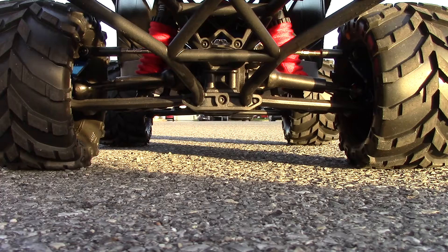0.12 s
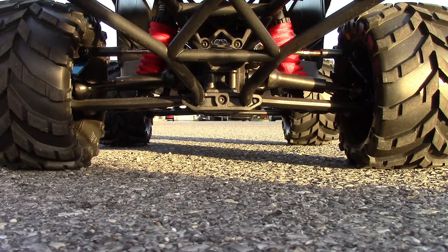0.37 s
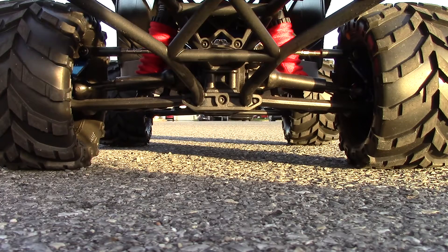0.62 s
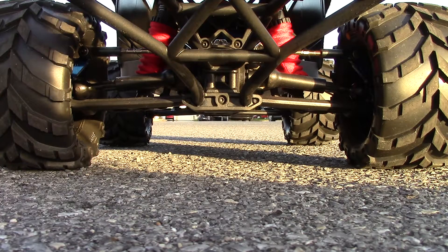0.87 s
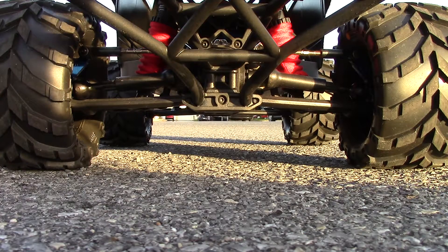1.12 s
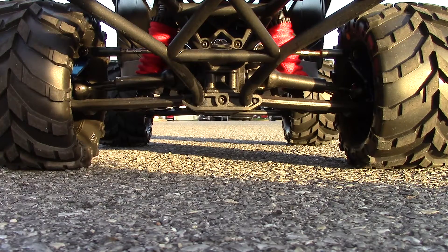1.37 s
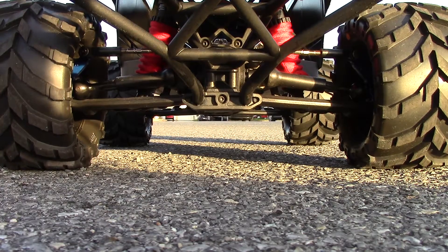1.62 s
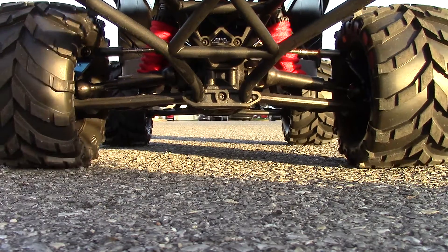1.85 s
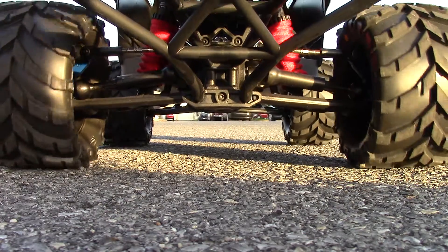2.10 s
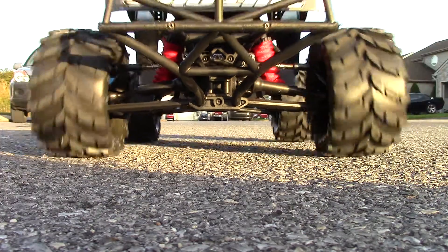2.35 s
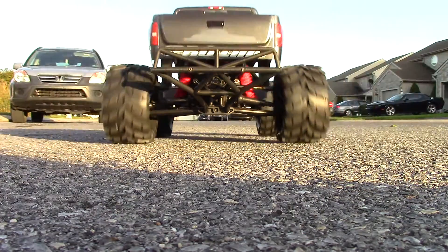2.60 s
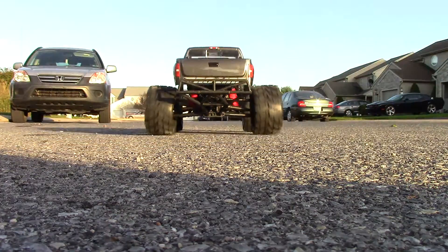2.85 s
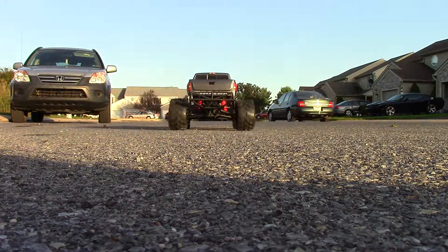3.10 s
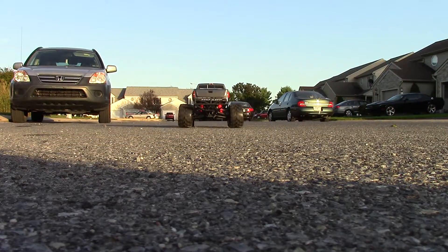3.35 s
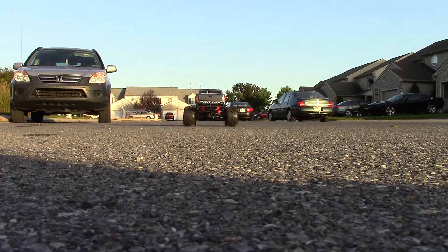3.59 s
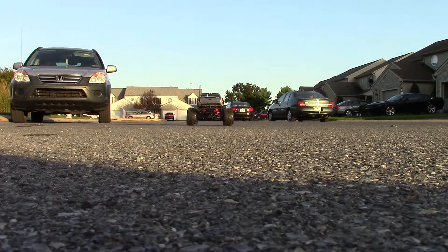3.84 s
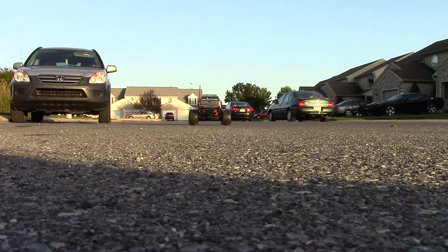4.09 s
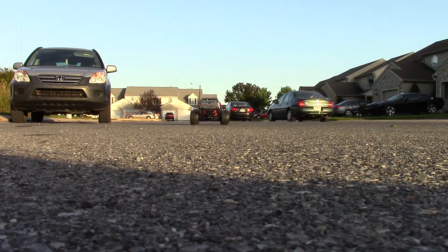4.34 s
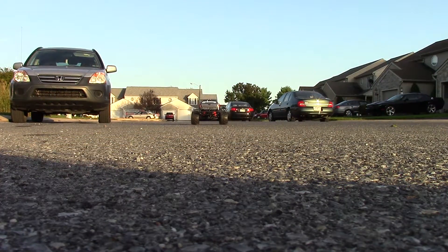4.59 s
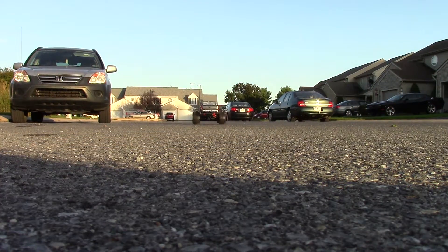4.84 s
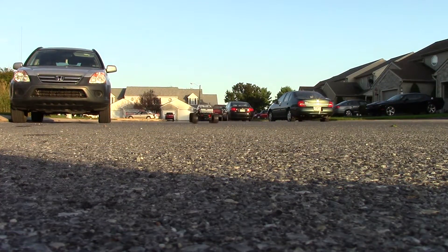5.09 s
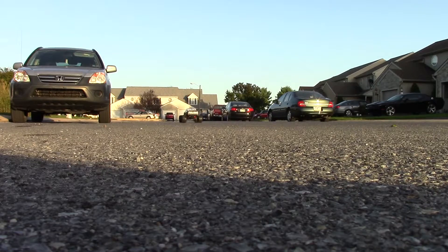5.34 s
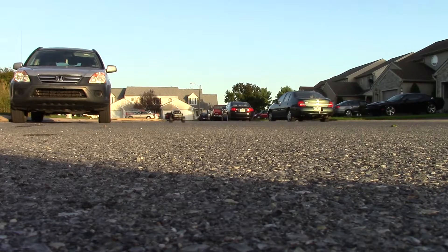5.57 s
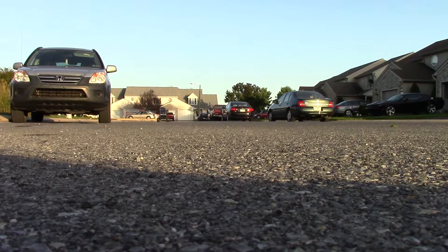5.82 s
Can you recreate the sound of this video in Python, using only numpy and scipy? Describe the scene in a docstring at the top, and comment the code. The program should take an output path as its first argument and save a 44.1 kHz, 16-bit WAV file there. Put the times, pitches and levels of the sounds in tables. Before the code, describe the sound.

Close, nearly central sound of a model truck on a quiet street: soft fan rush and a dull knock first, then a harsh buzzing whine near 1.8 kilohertz stuttering over gritty tyre slips. The truck pulls off, skids briefly, and rattles away on slowing, fading ticks. After a near lull come faint braking tones, then far-off gear whine and tyre roar.

```python
"""On asphalt, with street murmur behind: an electric model truck stands close by, its fan running.
The speed controller whines in harmonics of its switching tone; the wheels lurch and scrub in bursts of
shaped noise. The truck rolls off, brakes and coasts, its gear lash knocking once a shaft turn. Far away
it brakes again and accelerates with a noisy gear-mesh whine and tyre roar."""
import sys
import numpy as np
from scipy import signal
from scipy.fft import rfft, irfft, next_fast_len
from scipy.io import wavfile
from scipy.ndimage import uniform_filter1d, minimum_filter1d

SR = 44100
rng = np.random.default_rng(int(sys.argv[2]) if len(sys.argv) > 2 else 0)


def field_ratio(decibels):
    """Amplitude ratio for a level in dB (20 dB per decade); scalars and array-likes work."""
    return 10 ** (np.asarray(decibels, dtype=float) / 20)


def unload_audio(sound):
    """Save the sound as a 16-bit wav file, at the path given as the first command line argument."""
    columns = np.transpose(np.atleast_2d(sound))
    # keep every value between -1 and 1, then stretch to whole-number steps
    steps = np.round(np.clip(columns, -1, 1) * 32767)
    wavfile.write(sys.argv[1], SR, steps.astype(np.int16))


N = 262395
TIME = np.arange(N) / SR   # [s]

# switching tone: (time [s], pitch [Hz], rotor rattle [0-1], overtone blur [0-1])
CHOPPER = [(1.03, 1767, .05, .1), (1.43, 1768, .1, .2), (1.47, 1770, .42, .72), (2.12, 1770, .42, .78),
           (2.2, 1765, .45, .93), (2.23, 1748, .3, .94), (2.27, 1764, .26, .94), (2.35, 1762, .18, .92),
           (2.8, 1754, .14, .85)]
# its harmonics: (multiple, relative level [dB])
CHOPPER_ORDERS = [(1, 0), (2, -16.5), (3, -25), (4, -31), (5, -34.5), (6, -41.5), (7, -45), (8, -47)]
# its brightness: (time [s], lift of orders 2 and up [dB], tilt above order 3 [dB per order])
CHOPPER_TILT = [(1.03, 6, 3), (1.38, 6, 2.5), (1.42, 2, 1), (2.1, 3, 0.5), (2.3, 3, -1.5), (2.5, -1, -2),
                (2.8, -2, -2)]
# share of the blur, one value per harmonic: [0-1]
BLUR_SHARE = [0, 1, 1, 1, .95, .95, 1, 1]
# throttle, as the whine it gives: (time [s], level [dB])
THROTTLE = [(1.39, -24), (1.437, -23), (1.452, -12.5), (1.55, -9.5), (1.6, -11.5), (1.66, -13.5),
            (1.735, -6), (1.795, -7.5), (1.81, -18), (1.895, -13), (1.925, -8.5), (2.02, -9.5), (2.13, -10),
            (2.15, -23.5), (2.17, -17.5), (2.22, -6.5), (2.48, -10), (2.8, -14)]
# faint whine before the wheels move; throttle let go
CREEP_START_S, CREEP_DB, RELEASE_S = 1.037, -43, 2.803
# a new throttle value every radio frame, each a little off the stick position
FIRST_FRAME_S, FRAME_S, FRAME_SPREAD_DB = 1.386, .019876, 1.5
# the drive shaft speeds up evenly; the whine throbs once a turn
LAUNCH_S, LAUNCH_TURNS_PER_S, SPEEDUP_TURNS_PER_S2 = 2.225, 5.8, 48.4
THROB_DB, THROB_GROWTH_DB_PER_S = 3.5, 4.5
# gear mesh while gathering speed: (time [s], pitch [Hz], level [dB])
LAUNCH_MESH = [(2.25, 503, -35), (2.42, 690, -40.5), (2.58, 962, -44), (2.66, 1083, -52), (2.75, 1230, -32),
               (2.92, 2050, -45)]

# tyres slipping on grit: (time [s], thud [dB], scrub [dB], length [s])
LURCHES = [(1.466, -28.5, -22.5, 0.038), (1.534, -26, -24, 0.035), (1.566, -39, -22, 0.039),
           (1.605, -14.5, -9.5, 0.031), (1.65, -15, -10, 0.036), (1.703, -13, -6, 0.023),
           (1.885, -14, -10.5, 0.026), (1.95, -18, -16, 0.026), (2.006, -20, -12, 0.051),
           (2.035, -23, -12.5, 0.035), (2.08, -19.5, -11, 0.029), (2.18, -23.5, -15.5, 0.021),
           (2.199, -19.5, -13, 0.015)]
# thud spectrum: (frequency [Hz], relative density [dB])
THUD = [(88, -61), (150, -38), (248, -19), (667, -1), (825, -15), (1280, -5.5), (1580, -14.5), (1790, -5),
        (2030, -19), (3000, -15.5), (3900, -30), (6600, -120)]
# scrub and skid spectrum: (frequency [Hz], relative density [dB])
SCRUB = [(300, -70), (900, -48), (1250, 1.5), (2000, -1.5), (2700, 3), (3500, -0.5), (4300, -6), (5300, -7),
         (6500, -14), (8500, -12), (10000, -19), (11800, -11), (14500, -30), (15700, -36)]
# dull knock on the plastic shell: (time [s], level [dB], swell [s], fade [s])
SHELL_KNOCK = (0.034, -24, .017, .01)
# its spectrum: (frequency [Hz], relative density [dB])
SHELL = [(150, -40), (350, -8), (700, 0), (1000, -1), (1400, -8), (1900, -8), (3000, -18), (6000, -50)]

# rolling: (time [s], tread rumble [dB], grit and gear clatter [dB], grit hiss [dB])
ROLLING = [(1.36, -61, -46, -56), (1.46, -55, -25.5, -39), (1.59, -42, -21.5, -32),
           (1.7, -37.5, -31.5, -32.5), (1.98, -39, -20.5, -24), (2.09, -57, -55, -80),
           (2.198, -42, -24.5, -28.5), (2.754, -44, -26.5, -36), (2.9, -37.5, -22, -36.5),
           (2.94, -41, -36, -39), (3.174, -49.5, -48.5, -50.5), (3.716, -52.5, -48.5, -54.5),
           (4.3, -56, -59, -80), (4.486, -55.5, -46.5, -51.5), (4.8, -57, -36.5, -56)]
# tread rumble spectrum: (frequency [Hz], relative density [dB])
RUMBLE = [(60, -53), (150, -34), (300, -6.5), (450, 0), (650, 0.5), (850, -9), (1100, -10), (1400, -13),
          (3000, -78)]
# grit hiss spectrum: (frequency [Hz], relative density [dB])
HISS = [(1500, -55), (3500, 14.5), (4600, 10), (5400, 8), (6200, 4), (7100, 8), (8200, 2), (9800, -3.5),
        (11500, -1.5), (13500, -25), (15700, -35)]
# gearbox and frame resonances: (frequency [Hz], width [Hz], gain [dB])
CHASSIS = [(1269, 64, -4), (1570, 260, -4.5), (1880, 76, 6), (2143, 39, 8), (2524, 77, 0.5),
           (2834, 71, 3.5), (3070, 82, 2.5), (3635, 110, -1.5)]

# braking tone: (start [s], end [s], pitch [Hz], swell by the end [dB], orders 1, 2, 3, 4 [dB])
BRAKES = [(2.806, 2.914, 1503, -6, -18.5, -21.5, -55, -55), (4.393, 4.608, 1496, 8, -55, -47.5, -63, -70.5),
          (4.613, 4.791, 1490, 8, -66, -36.5, -82, -64), (4.768, 5.4, 1484, 1, -80, -75, -80, -53)]
# locked tyres: (start [s], end [s], level [dB])
SKID = (2.77, 2.922, -21.5)

# coasting: the shaft slows evenly, the lash knocks once a turn, fainter with distance
TEETH = 42
COAST_S, COAST_END_S, COAST_TURNS_PER_S, SLOWING_TURNS_PER_S2 = 2.9413, 4.4, 51.21, 21.23
KNOCK_DB, KNOCK_FADE_DB_PER_S, KNOCK_SPREAD_DB, KNOCK_JITTER_TURNS = -21.5, 16.5, 1.9, 0.052
TICK_DB, TICK_FADE_DB_PER_S, TICK_SPREAD_DB = -58, 17, 6
# mesh tone in the knock sinks away
MESH_SHARE_DB, MESH_SHARE_END_DB, MESH_SHARE_FADE_S = 9, -10, .4
# turns with their own time and levels: (time [s], knock [dB], bright tick [dB])
TIMED_KNOCKS = [(2.943, -29, -55), (2.962, -19, -54), (3.061, -21.5, -50), (3.103, -19, -48),
                (3.123, -21.5, -60), (3.187, -25, -45), (3.21, -20.5, -61), (3.2315, -22.5, -61),
                (3.254, -22.5, -59), (3.274, -22.5, -62), (3.323, -24.5, -54), (3.392, -27, -53),
                (3.516, -26.5, -50), (3.653, -28.5, -65), (3.735, -36.5, -53), (3.8883, -31.5, -62),
                (4.062, -36.5, -56), (4.2084, -40, -56), (4.3, -44, -66), (4.36, -49, -56)]
# tick spectrum: (frequency [Hz], relative density [dB])
TICK = [(5000, -47), (7000, -5), (9500, -11), (11200, -3), (13000, -19), (15500, -44)]
# body shell droning while the wheels turn: (time [s], level [dB])
DRONE = [(2.25, -37), (2.54, -33), (2.72, -40.5), (3.6, -46.5), (4.13, -52.5), (4.7, -55)]

# gear mesh far off: (time [s], pitch [Hz], level [dB])
MESH = [(4.75, 950, -45), (4.8, 1200, -41), (4.84, 1800, -35), (4.88, 2250, -33.5), (4.95, 2602, -33),
        (5.031, 2902, -33), (5.11, 2650, -33.5), (5.2, 3053, -34.5), (5.35, 3250, -34.5), (5.46, 3900, -32),
        (5.53, 5200, -37.5), (5.601, 5500, -36), (5.79, 4860, -47)]
# its harmonics: (multiple, gain [dB])
MESH_ORDERS = [(1, 7.5), (2, -5), (3, -6.5)]
# tyres under power far off: (time [s], tread rumble [dB], roar [dB], hiss [dB])
PULL = [(4.78, -47, -28, -39), (4.82, -38.5, -38, -49), (4.906, -31.5, -34.5, -42.5),
        (5.066, -33, -33.5, -43), (5.104, -43, -34, -43.5), (5.242, -39, -34, -41),
        (5.476, -38.5, -31.5, -43.5), (5.54, -30.5, -28, -34.5), (5.734, -38, -30.5, -40),
        (5.854, -46, -37.5, -58), (5.95, -47, -36, -55)]
# roar spectrum: (frequency [Hz], relative density [dB])
ROAR = [(410, -37), (700, -23), (846, 2), (997, -9.5), (1160, -0.5), (1650, -3.5), (2550, 1.5), (4100, -6),
        (5000, -14), (6500, -57), (11000, -120)]
# far hiss spectrum: (frequency [Hz], relative density [dB])
FAR_HISS = [(2650, -78), (4500, -54), (4890, -39.5), (5890, 2), (6630, 5), (7240, 1), (9530, -10),
            (11100, -6.5), (14300, -32), (15500, -39)]

# cooling fan: (time [s], rush level [dB])
FAN = [(0.0, -36), (1.76, -36), (2.6, -47.5), (4.44, -53), (4.85, -46.5), (5.95, -47.5)]
# air rush spectrum: (frequency [Hz], relative density [dB])
FAN_RUSH = [(18, -56), (30, -25), (173, 0), (270, -5), (359, -2.5), (996, -10), (1140, -15), (1260, -12.5),
            (1640, -11.5), (2020, -15.5), (2420, -10), (4090, -11), (5170, -24.5), (6210, -18.5),
            (15500, -55)]
# steady blade tones: (frequency [Hz], level [dB])
FAN_TONES = [(177.6, -51), (360.7, -49.5), (430.7, -51.5), (1168, -44), (2342, -47.5), (3133, -50),
             (3327, -51), (4097, -58.5), (5389, -61), (6137, -57.5), (6686, -69)]
# street murmur spectrum: (frequency [Hz], relative density [dB])
STREET = [(18, -45), (30, -1), (455, -9.5), (728, -15), (1330, 1.5), (1640, -7), (2180, -1), (6050, -67),
          (11000, -20), (15500, -62)]
# stereo scatter: (frequency [Hz], side against mid [dB])
WIDTH = [(60, -21), (110, -28), (200, -24), (380, -30), (700, -36), (1290, -37), (2380, -34), (4400, -30),
         (8120, -29), (15000, -23)]


def rms_one(x):
    """Scale to rms 1."""
    return x / np.sqrt(np.mean(np.abs(x) ** 2) + 1e-20)


def in_time(rows):
    """Columns of a curve table, one value a sample."""
    s, *columns = np.transpose(rows)
    return [np.interp(TIME, s, c) for c in columns]


def shaped(x, spectrum):
    """Filter x by a (Hz, dB) spectrum, interpolated over log frequency."""
    size = next_fast_len(N)
    hz, db = np.transpose(spectrum)
    grid_hz = np.maximum(np.arange(size // 2 + 1) * SR / size, 1)
    gain = field_ratio(np.interp(np.log(grid_hz), np.log(hz), db))
    return irfft(rfft(x, size) * gain, size)[:N]


def coloured(x, spectrum):
    """Shaped and scaled to rms 1."""
    return rms_one(shaped(x, spectrum))


def noise(spectrum):
    """Coloured Gaussian noise, rms 1."""
    return coloured(rng.standard_normal(N), spectrum)


def wobble(width_hz):
    """Complex noise through a double one-pole low-pass; rms 1."""
    r = np.exp(-2 * np.pi * width_hz / SR)
    white = rng.standard_normal(N) + 1j * rng.standard_normal(N)
    return rms_one(signal.lfilter([1], [1, -2 * r, r * r], white))


def grit(per_s, spread_db, bed):
    """Sparse clicks of uneven size over a bed of noise."""
    sizes = field_ratio(spread_db * np.minimum(rng.exponential(1, N), 5)) * rng.choice([-1, 1], N)
    clicks = rms_one(sizes * (rng.random(N) < per_s / SR))
    return clicks + bed * rng.standard_normal(N)


def cycles(hz):
    """Running phase [rad] of a pitch curve."""
    return 2 * np.pi * np.cumsum(hz) / SR


def gate(start_s, end_s, edge_s):
    """1 between start and end, with linear edges inside."""
    return np.clip(np.minimum(TIME - start_s, end_s - TIME) / edge_s, 0, 1)


def bursts(times_s, gains, rises_s, falls_s):
    """Envelope of events that swell linearly and die exponentially."""
    out = np.zeros(N)
    for s, gain, rise, fall in np.broadcast(times_s, gains, rises_s, falls_s):
        i = int(s * SR)
        age = np.arange(min(int((rise + 6 * fall) * SR), N - i)) / SR
        decay = np.exp(-np.maximum(age - rise, 0) / fall)
        out[i:i + len(age)] += gain * np.minimum(age / rise, 1) * decay
    return out


def chassis(x, direct, patchy_db):
    """Plastic gearbox and frame resonances in parallel, each excited unevenly; rms 1."""
    out = direct * signal.sosfilt(signal.butter(2, [1000, 4500], "band", fs=SR, output="sos"), x)
    for k, (hz, width_hz, db) in enumerate(CHASSIS):
        r = np.exp(-np.pi * width_hz / SR)
        a = [1, -2 * r * np.cos(2 * np.pi * hz / SR), r * r]
        b = [(1 - r * r) / 2, 0, (r * r - 1) / 2]
        uneven = field_ratio(db + patchy_db * np.real(wobble(18)))
        out += (-1) ** k * signal.lfilter(b, a, uneven * x)
    return rms_one(out)


def radio_frames():
    """Start [s] and whine level [dB] of every throttle frame."""
    starts = np.arange(FIRST_FRAME_S, RELEASE_S, FRAME_S)
    s, db = np.transpose(THROTTLE)
    spread_db = FRAME_SPREAD_DB * rng.standard_normal(len(starts))
    return starts, np.interp(starts + FRAME_S / 2, s, db) + spread_db


def launch_throb_db():
    """Level swing once a shaft turn while the truck gathers speed."""
    age = TIME - LAUNCH_S
    turns = LAUNCH_TURNS_PER_S * age + SPEEDUP_TURNS_PER_S2 * age ** 2 / 2
    depth_db = THROB_DB + THROB_GROWTH_DB_PER_S * age
    return depth_db * np.cos(2 * np.pi * turns) * gate(LAUNCH_S - FRAME_S, 9, FRAME_S)


def rotor_rattle(rattle):
    """The loose rotor rattles the motor can just above the tone: a noise band at 1830 Hz."""
    return 1.89 * rattle * np.real(wobble(77) * np.exp(2j * np.pi * 1830 * TIME))


def can_hiss():
    """The motor can hisses in a high resonance while it points at the microphone."""
    band = np.real(wobble(540) * np.exp(2j * np.pi * 11200 * TIME))
    return field_ratio(-28.5) * gate(1.7, 2.32, 0.023) * band


def chopper():
    """Switching tone of the motor windings; it dips and changes level at each radio frame."""
    (hz, rattle, blur), (lift_db, tilt_db) = in_time(CHOPPER), in_time(CHOPPER_TILT)
    starts, level_db = radio_frames()
    frame = np.searchsorted(starts, TIME) - 1
    driven = field_ratio(level_db[frame] + launch_throb_db())
    level = np.where(frame < 0, field_ratio(CREEP_DB), driven) * gate(CREEP_START_S, RELEASE_S, 0.0021)
    dip = (frame >= 0) * np.exp(-np.abs(TIME - starts[frame]) / .003)   # the current builds up again
    level = uniform_filter1d(level * (1 - .3 * dip), size=50)
    slip = np.cumsum(rng.normal(0, .22, len(starts)))[frame]   # the phase slips at each dip [rad]
    phase = cycles(hz) + uniform_filter1d(slip, size=40)
    out = rotor_rattle(rattle) + can_hiss()
    for (order, db), blur_share in zip(CHOPPER_ORDERS, BLUR_SHARE):
        share = blur * blur_share
        carrier = np.sqrt(1 - np.maximum(share, rattle) ** 2) + share * wobble(60 * order)
        order_db = db + lift_db * (order > 1) + tilt_db * max(order - 3, 0)
        out += field_ratio(order_db) * np.real(carrier * np.exp(1j * order * phase))
    low_cut = signal.butter(2, 900, "high", fs=SR, output="sos")   # keep whine and rattle above 900 Hz
    return signal.sosfilt(low_cut, np.sqrt(2) * level * out)


def launch_mesh():
    """Gear teeth meshing while the shaft speeds up: a narrow noise band on a rising pitch."""
    hz, db = in_time(LAUNCH_MESH)
    return field_ratio(db) * gate(2.3, 2.94, 0.024) * np.real(wobble(32) * np.exp(1j * cycles(hz)))


def lurches():
    """Each slip thumps the tyres and scrapes grit: paired bursts of dull noise and crackle."""
    s, thud_db, scrub_db, length = np.transpose(LURCHES)
    thud = bursts(s - .006, field_ratio(thud_db), 0.011, .5 * length) * noise(THUD)
    flicker = field_ratio(4.5 * np.real(wobble(40)))
    scrape = coloured(grit(1500, 2.75, bed=0.46), SCRUB)
    return thud + bursts(s - .006, field_ratio(scrub_db), 0.0076, 0.5 * length) * flicker * scrape


def shell_knock():
    """One dull knock on the plastic shell: a short burst of shaped noise."""
    s, db, swell, fade = SHELL_KNOCK
    return bursts([s], field_ratio(db), swell, fade) * noise(SHELL)


def rolling():
    """Tread blocks rumble, grit crackles through the chassis and hisses; flicker is deepest up close."""
    rumble_db, clatter_db, hiss_db = in_time(ROLLING)
    flicker_db = np.interp(TIME, [LAUNCH_S, SKID[1]], [4.0, 1.5]) * np.real(wobble(49))
    crackle = grit(3500, 4.8, bed=0.79)
    rumble = field_ratio(rumble_db + 2.5 * np.real(wobble(15))) * noise(RUMBLE)
    clatter = field_ratio(clatter_db + flicker_db) * chassis(crackle, direct=0.24, patchy_db=4.0)
    hiss = field_ratio(hiss_db + flicker_db) * coloured(crackle, HISS)
    return gate(1.17, 5.3, 0.042) * (rumble + clatter + hiss)


def brakes():
    """The braking chopper sings lower; the first stop sags into pitch, roughly."""
    out = np.zeros(N)
    sag = 1 + .065 * np.exp(-np.abs(TIME - BRAKES[0][0]) / .02)
    rough = .16 + .6 * gate(2.7, 3.1, .1)
    for start, end, hz, swell_db, *orders_db in BRAKES:
        swell = field_ratio(swell_db * np.clip((TIME - start) / (end - start), 0, 1))
        flutter = (1 + rough * wobble(70)) * swell
        phase = cycles(hz * sag)
        tone = sum(field_ratio(db) * np.exp(1j * (k + 1) * phase) for k, db in enumerate(orders_db))
        out += np.sqrt(2) * gate(start, end, 0.0041) * np.real(flutter * tone)
    return out


def skid():
    """Locked tyres scrape grit: flickering crackle that swells and stops."""
    start, end, db = SKID
    swell = np.clip((TIME - start) / .03, 0, 1) * gate(0, end, .008)
    far = signal.butter(2, 7200, fs=SR, output="sos")   # already some way off
    scrape = signal.sosfilt(far, coloured(grit(3000, 3.5, bed=1.2), SCRUB))
    return swell * field_ratio(db + 1.8 * np.real(wobble(47.3))) * scrape


def knock_rows():
    """Time [s], knock [dB] and tick [dB] of each turn of the slowing shaft."""
    rate, span = COAST_TURNS_PER_S, COAST_END_S - COAST_S
    turn = np.arange(int(rate * span - SLOWING_TURNS_PER_S2 * span ** 2 / 2))
    early, hard, bright = rng.standard_normal((len(turn), 3)).T
    turn = turn + KNOCK_JITTER_TURNS * early
    age = (rate - np.sqrt(rate ** 2 - 2 * SLOWING_TURNS_PER_S2 * turn)) / SLOWING_TURNS_PER_S2
    knock_db = KNOCK_DB - KNOCK_FADE_DB_PER_S * age + KNOCK_SPREAD_DB * hard
    tick_db = TICK_DB - TICK_FADE_DB_PER_S * age + TICK_SPREAD_DB * bright
    rows = np.transpose([COAST_S + age, knock_db, tick_db])
    for row in TIMED_KNOCKS:   # each replaces the nearest turn
        rows[np.argmin(np.abs(rows[:, 0] - row[0]))] = row
    return rows.T


def coasting():
    """Once a shaft turn the mesh tone swells and the lash rattles the chassis; slower turns last longer."""
    s, db, tick_db = knock_rows()
    turn_s = np.gradient(s)
    knocks = uniform_filter1d(bursts(s - .002, field_ratio(db), .3 * turn_s, .27 * turn_s), size=90)
    age = np.clip(TIME - COAST_S, 0, COAST_END_S - COAST_S)
    hz = TEETH * (COAST_TURNS_PER_S - SLOWING_TURNS_PER_S2 * age)
    sink = np.exp(-age / MESH_SHARE_FADE_S)
    tone_db = MESH_SHARE_END_DB + (MESH_SHARE_DB - MESH_SHARE_END_DB) * sink
    tone = field_ratio(tone_db) * np.real((0.7 + 0.32 * wobble(89)) * np.exp(1j * cycles(hz)))
    rattle = chassis(rng.standard_normal(N), direct=0.36, patchy_db=5.0)
    rattle /= np.sqrt(uniform_filter1d(rattle ** 2, size=700))   # every turn rattles
    loose = np.interp(TIME, [2.95, 3.12], [.15, .7])   # the lash opens as the drive unloads
    dull = signal.butter(2, 5500, fs=SR, output="sos")
    knocking = signal.sosfilt(dull, knocks * (tone + loose * rattle))
    ticks = bursts(s, field_ratio(tick_db), .002, 0.0043) * noise(TICK)
    return knocking + ticks


def shell_drone():
    """The body shell resonates at 1312 Hz while the wheels turn: a narrow unsteady tone."""
    tone = np.real((0.3 + wobble(54)) * np.exp(2j * np.pi * 1312 * TIME))
    return gate(DRONE[0][0], DRONE[-1][0], 0.018) * field_ratio(in_time(DRONE)[0]) * tone


def far_whine():
    """Gear mesh under power: broad noisy harmonics throbbing twice a shaft turn."""
    hz, db = in_time(MESH)
    phase = cycles(hz * (1 + .02 * np.real(wobble(25))))   # pitch wavers
    throb = field_ratio(4.0 * np.cos(2 * phase / TEETH) + 2.5 * np.real(wobble(30)))
    fast = np.clip(hz / 5000, 0, 1) ** 2   # the faster, the broader
    whine = np.zeros(N)
    for order, order_db in MESH_ORDERS:
        blur = (1 - fast) * wobble(220 * order) + fast * wobble(430 * order)
        whine += field_ratio(order_db) * np.real(blur * np.exp(1j * order * phase))
    dull = signal.butter(4, 8000, fs=SR, output="sos")   # air and ground dull the top
    return gate(MESH[0][0], MESH[-1][0], 0.021) * field_ratio(db) * throb * signal.sosfilt(dull, whine)


def far_tyres():
    """Tyres under power: tread rumble, with roar and hiss from one flickering crackle."""
    rumble_db, roar_db, hiss_db = in_time(PULL)
    crackle = grit(4000, 3.8, bed=1.2) * field_ratio(2.1 * np.real(wobble(50)))
    tyres = field_ratio(rumble_db) * noise(RUMBLE)
    tyres += field_ratio(roar_db) * coloured(crackle, ROAR)
    tyres += field_ratio(hiss_db) * coloured(crackle, FAR_HISS)
    return gate(4.78, 7, 0.043) * tyres


def fan():
    """Air rush as shaped noise, with slightly unsteady blade tones until 1.45 s."""
    rush = field_ratio(in_time(FAN)[0]) * noise(FAN_RUSH)
    tones = np.zeros(N)
    for hz, db in FAN_TONES:
        unsteady = 1 + 0.31 * wobble(hz / 120 + 6)
        tones += field_ratio(db) * np.real(unsteady * np.exp(2j * np.pi * hz * TIME))
    return rush + tones * gate(-1, 1.45, 0.04)


def street():
    """Steady street murmur: shaped noise at a constant level."""
    return field_ratio(-54.5) * noise(STREET)


def scene():
    """All sources near the centre; a faint scattered copy differs between the channels."""
    mid = chopper() + launch_mesh() + lurches() + shell_knock() + rolling() + brakes() + skid()
    mid += coasting() + shell_drone() + far_whine() + far_tyres() + fan() + street()
    scatter = rng.standard_normal(1800) * np.exp(-np.arange(1800) / 400)
    scattered = signal.fftconvolve(mid, scatter / np.linalg.norm(scatter))[:N]
    side = shaped(scattered, WIDTH)
    return mid + side * np.array([[1], [-1]])


def roll_off(x):
    """The treble ends steeply here."""
    return signal.sosfilt(signal.butter(12, 15770, fs=SR, output="sos"), x)


def record(dry):
    """A fast limiter holds the peaks down, then the deepest bass is cut."""
    room = np.minimum(1, .88 / (np.abs(dry).max(axis=0) + 1e-9))
    gain = uniform_filter1d(minimum_filter1d(room, size=90), size=60)   # eased in ahead of each peak
    low_cut = signal.butter(3, 50, "high", fs=SR, output="sos")
    mix = signal.sosfilt(low_cut, gain * dry)
    return roll_off(mix)


dry = scene()
out = record(dry)
unload_audio(out)
```